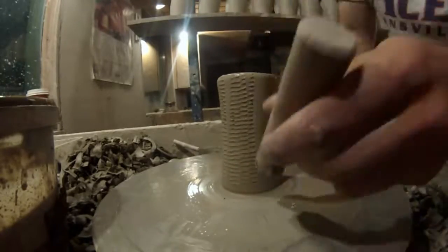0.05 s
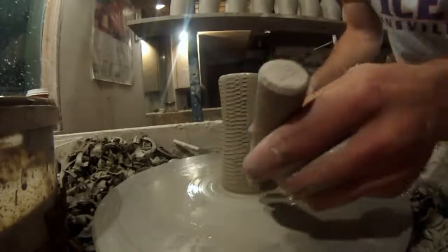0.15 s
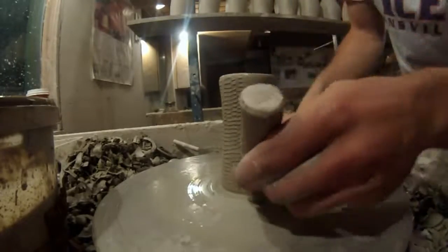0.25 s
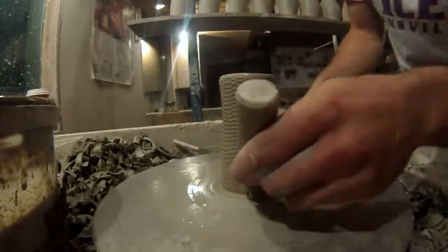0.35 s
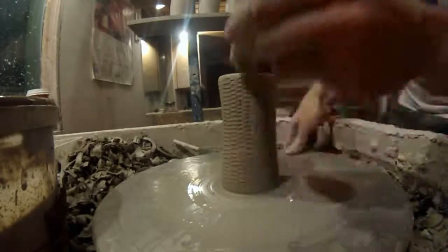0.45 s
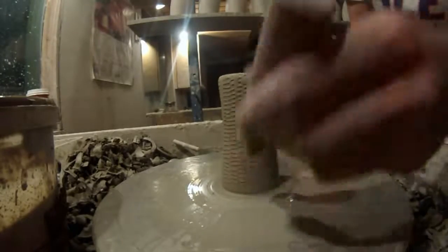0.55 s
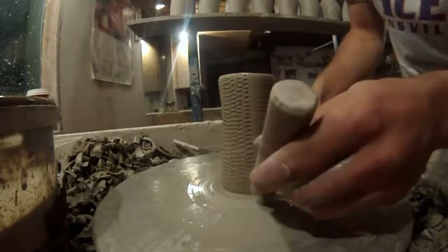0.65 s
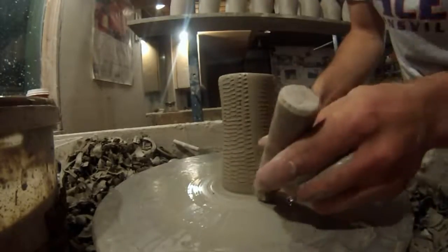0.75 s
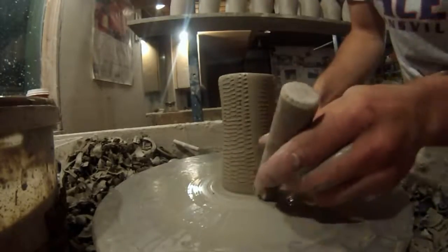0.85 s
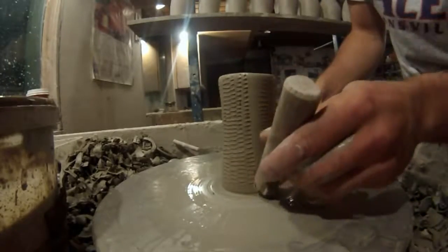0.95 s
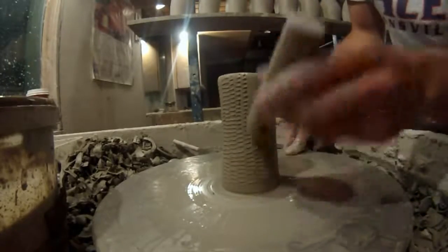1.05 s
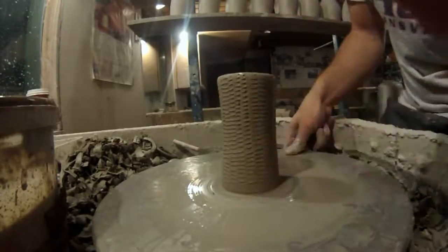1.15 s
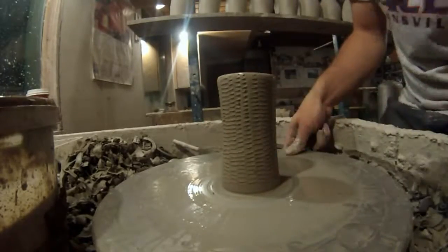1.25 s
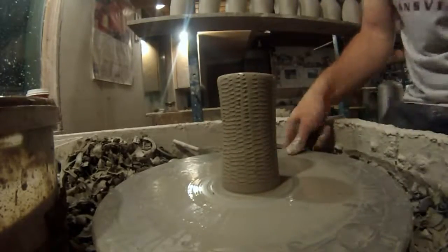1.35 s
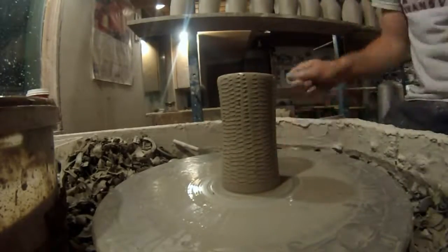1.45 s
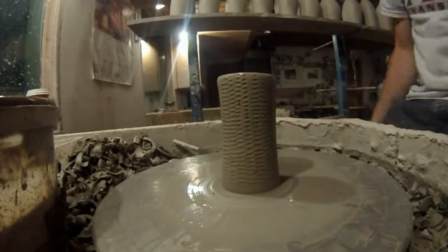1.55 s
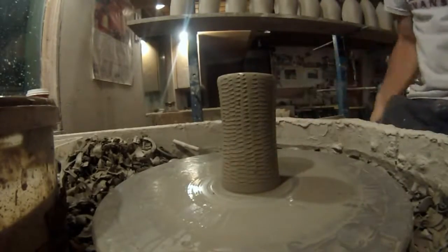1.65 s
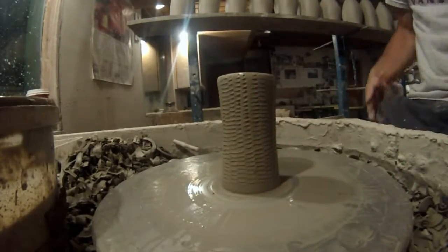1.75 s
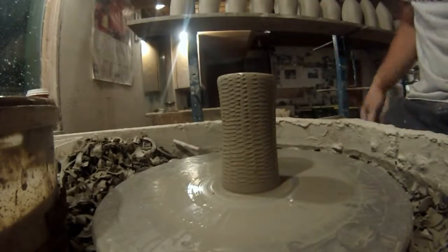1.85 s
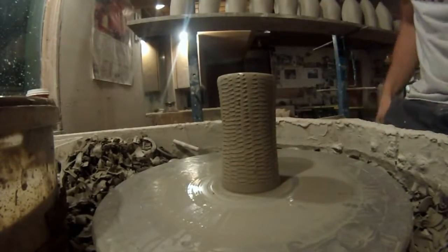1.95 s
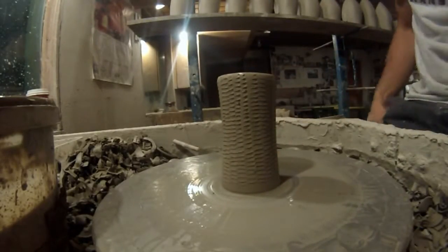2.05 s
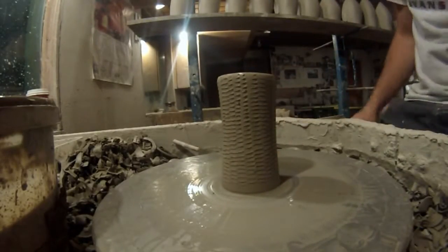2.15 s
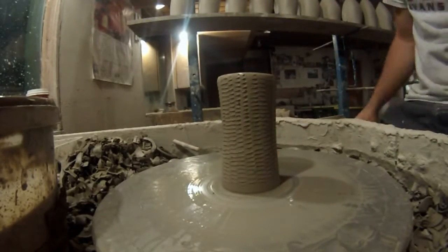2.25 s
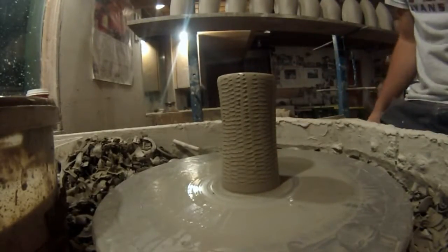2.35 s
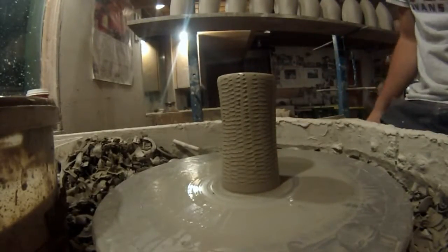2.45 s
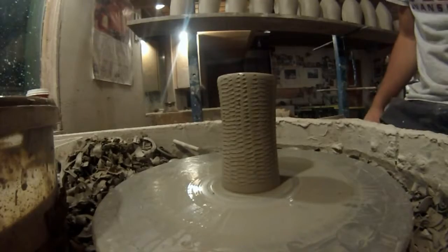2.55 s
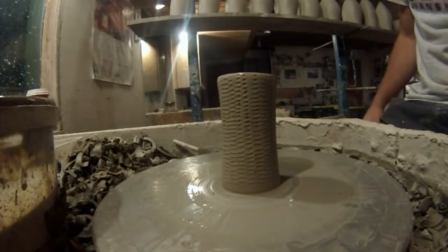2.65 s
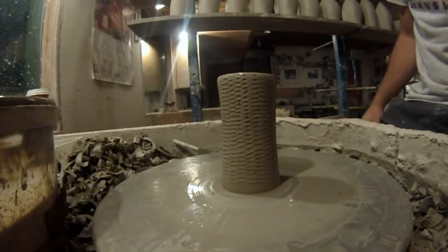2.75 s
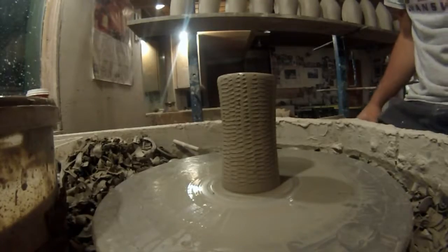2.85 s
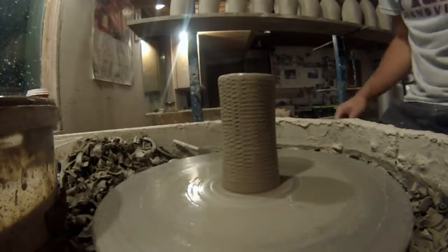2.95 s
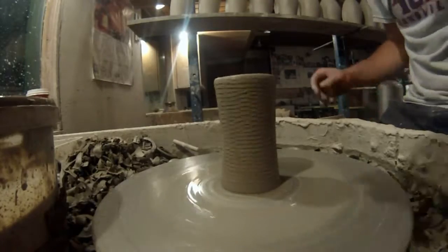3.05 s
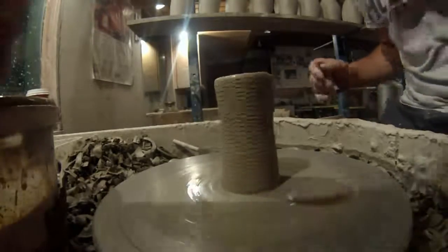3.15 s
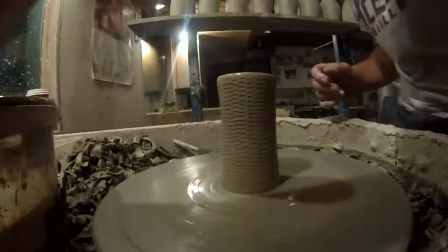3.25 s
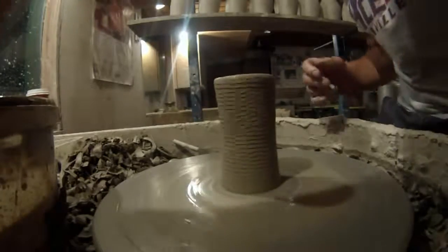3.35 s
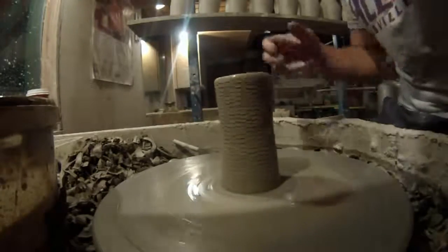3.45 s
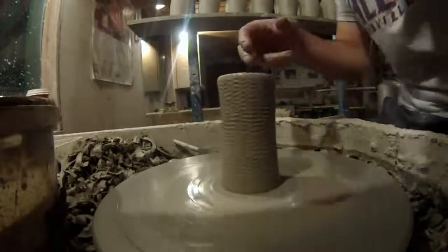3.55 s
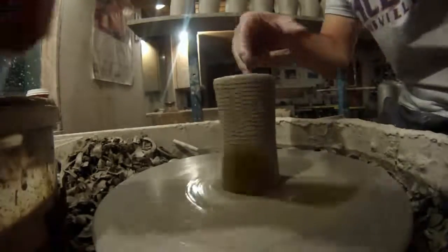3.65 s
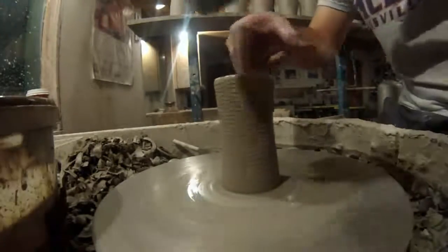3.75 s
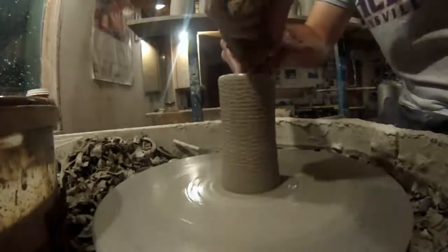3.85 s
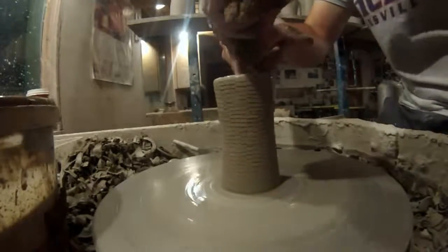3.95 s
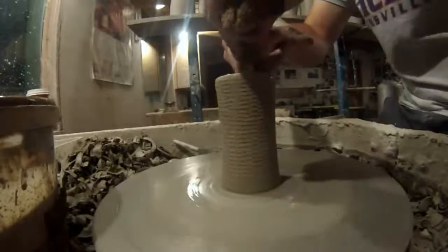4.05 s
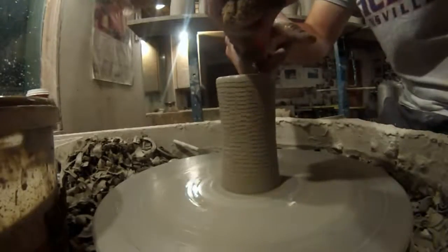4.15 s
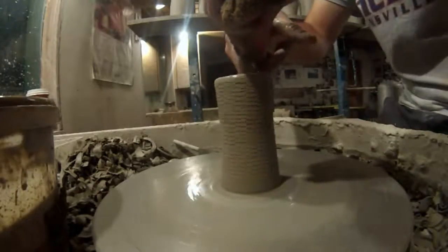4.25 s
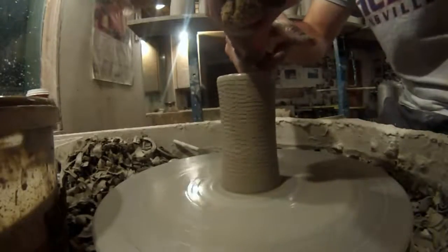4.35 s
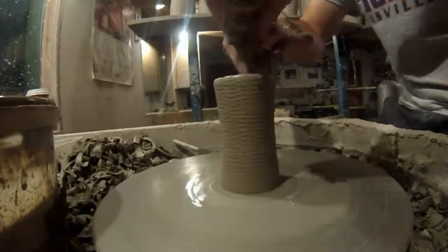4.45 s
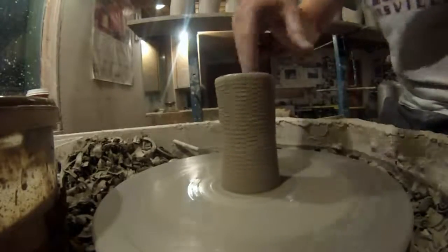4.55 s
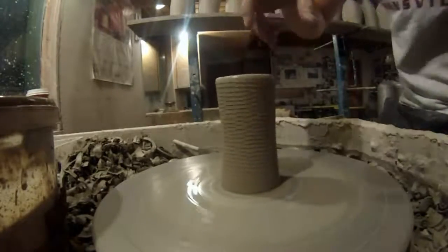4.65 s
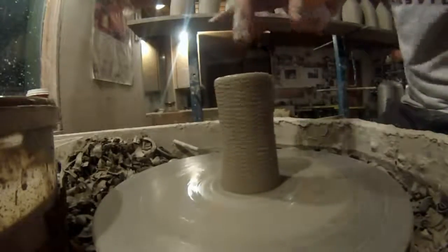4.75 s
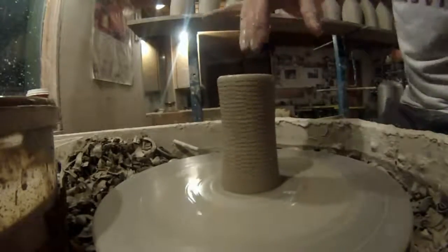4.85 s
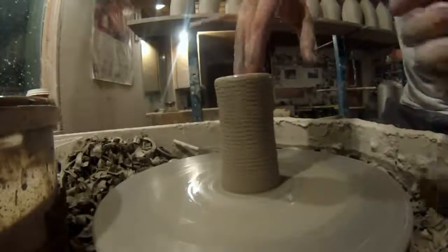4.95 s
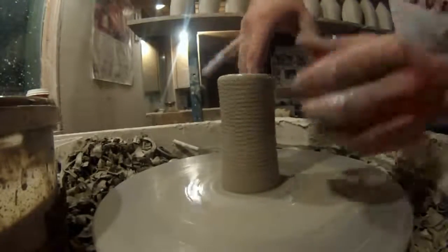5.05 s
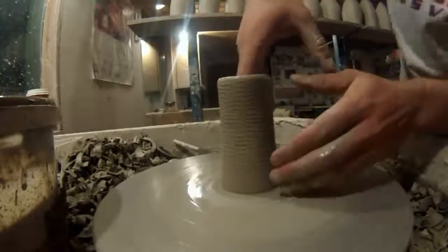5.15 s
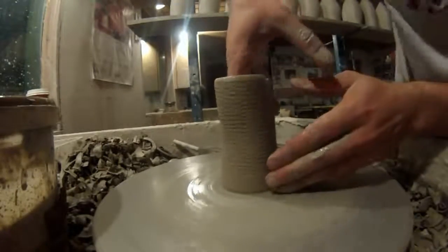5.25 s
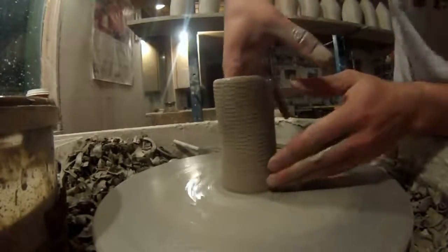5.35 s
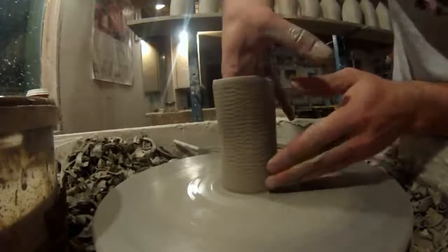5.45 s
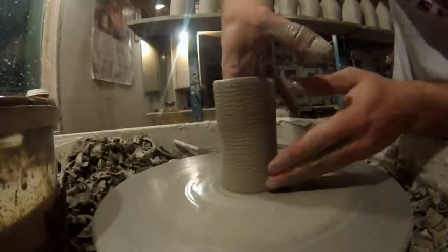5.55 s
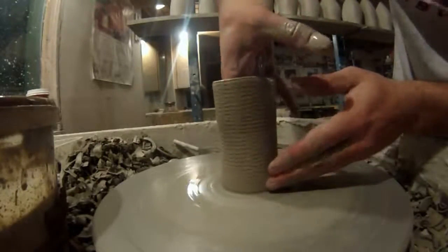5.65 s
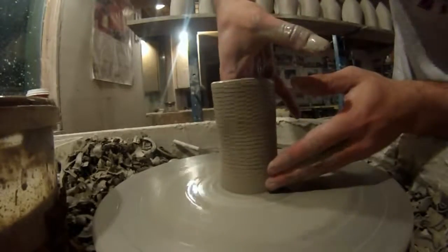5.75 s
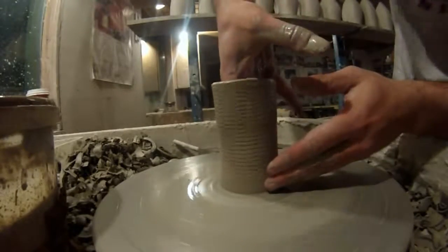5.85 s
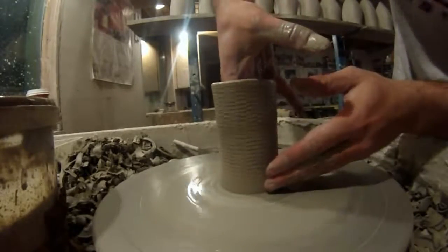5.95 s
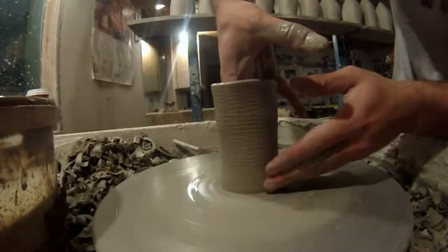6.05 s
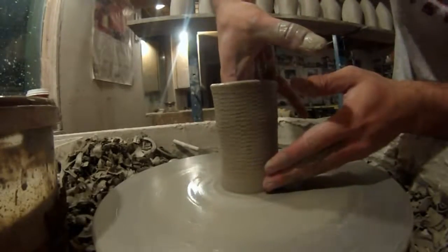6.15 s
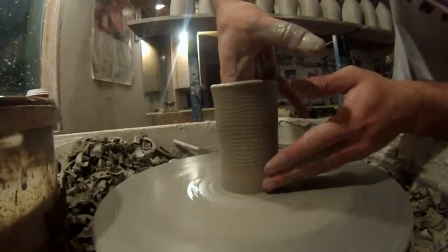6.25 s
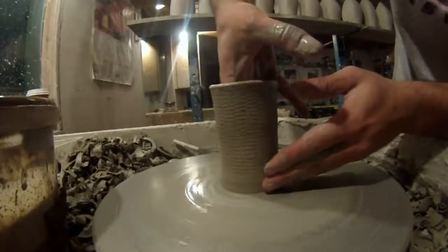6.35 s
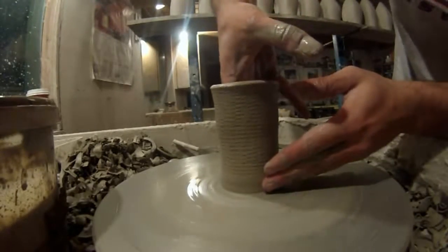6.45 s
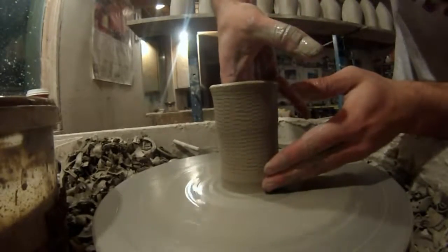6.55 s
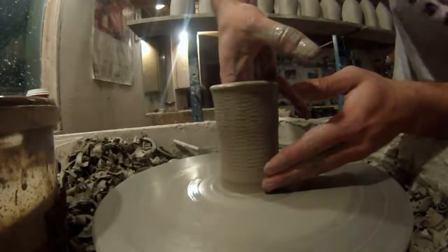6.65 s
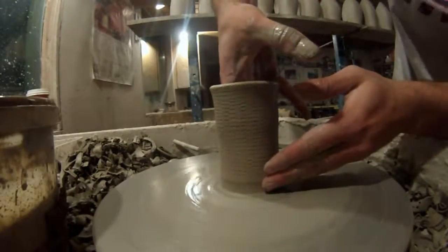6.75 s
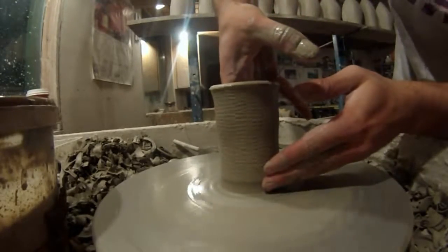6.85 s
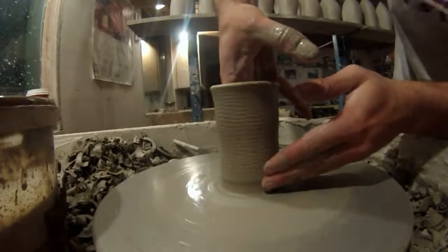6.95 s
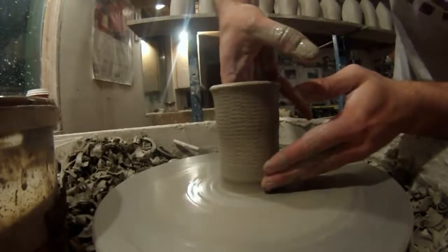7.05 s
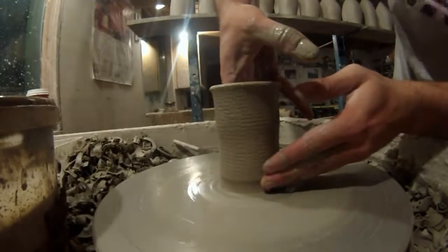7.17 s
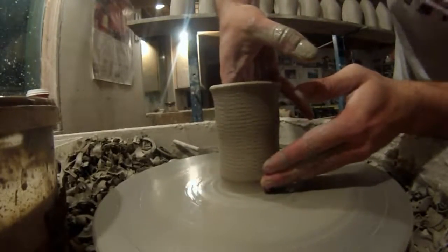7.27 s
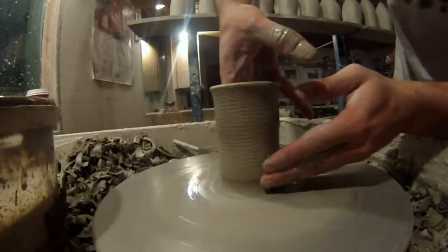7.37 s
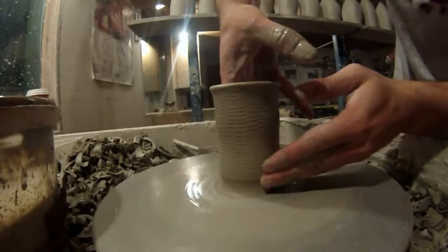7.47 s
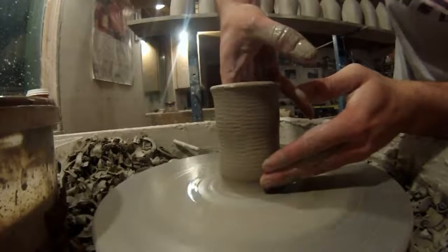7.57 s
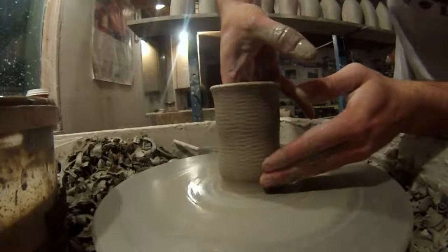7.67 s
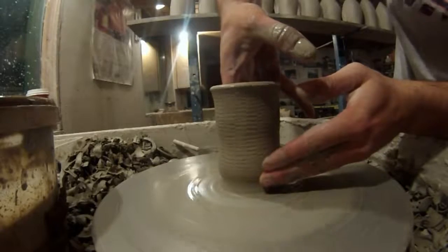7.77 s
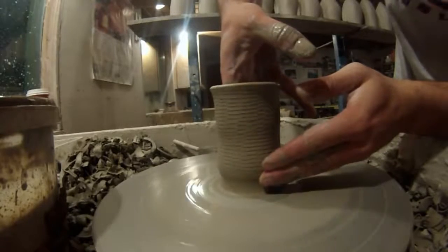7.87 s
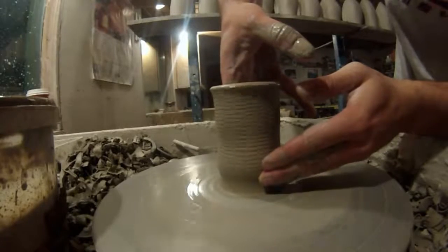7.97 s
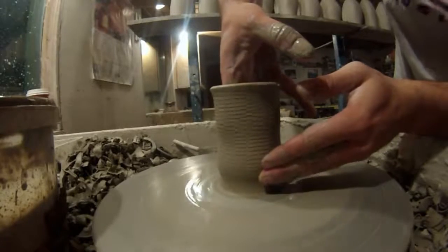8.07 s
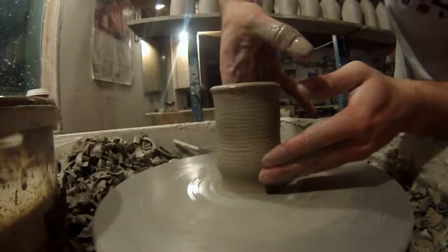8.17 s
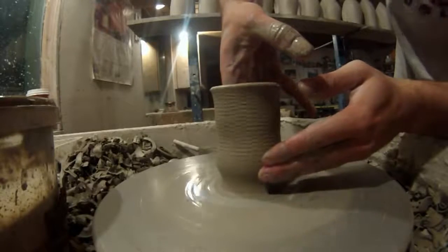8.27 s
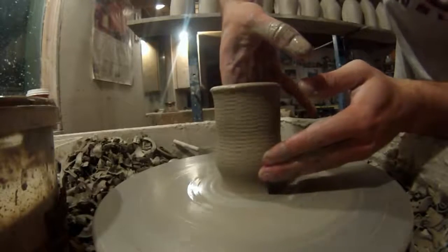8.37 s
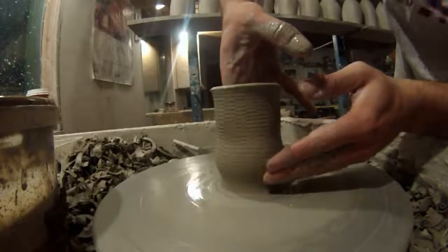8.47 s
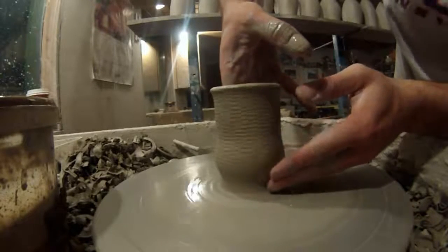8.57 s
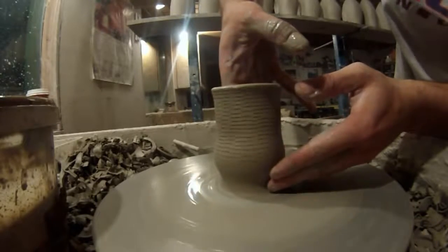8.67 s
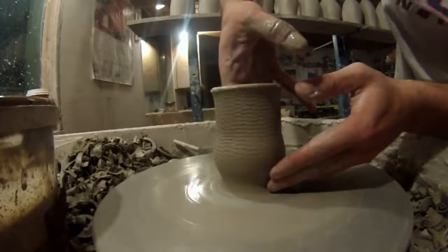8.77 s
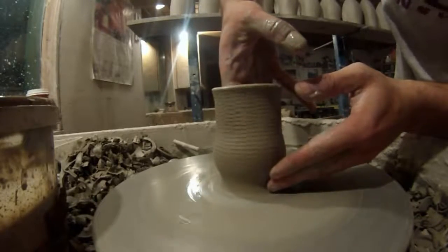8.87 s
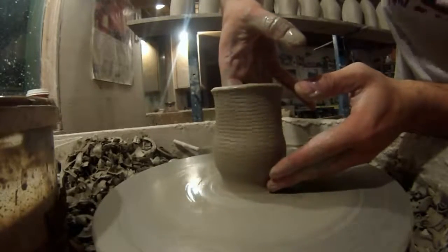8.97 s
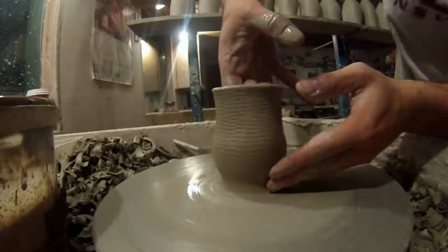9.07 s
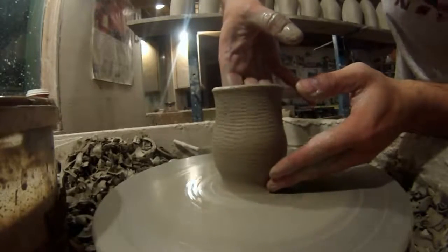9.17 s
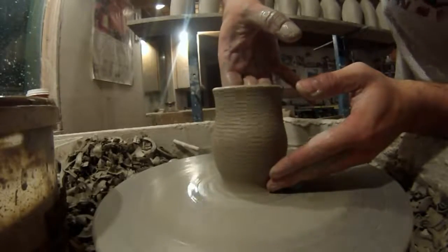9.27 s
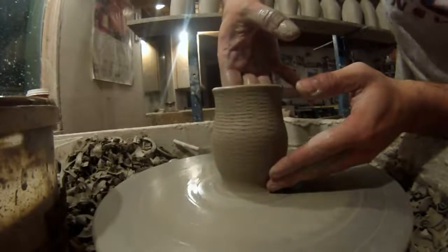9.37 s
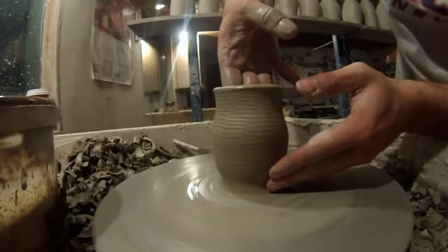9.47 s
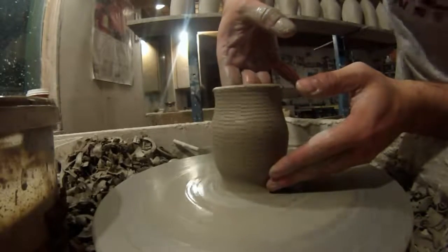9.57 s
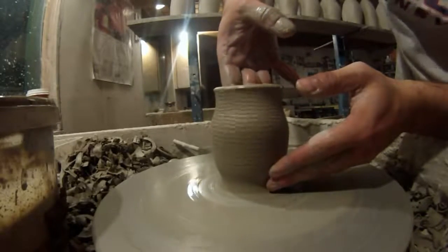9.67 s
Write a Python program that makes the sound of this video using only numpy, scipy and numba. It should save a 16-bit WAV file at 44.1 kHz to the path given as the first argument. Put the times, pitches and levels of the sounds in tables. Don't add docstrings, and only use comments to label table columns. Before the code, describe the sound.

Quiet workshop hiss and fan hum, soft clay rubbing and a wooden tool clack, then a pedal thump starts a low, rumbling, knocking pottery wheel motor.

```python
import sys
import numpy as np
from scipy import signal
from scipy.fft import rfft, irfft
from scipy.io import wavfile
from scipy.ndimage import uniform_filter1d
from numba import njit

SR = 44100
rng = np.random.default_rng(int(sys.argv[2]) if len(sys.argv) > 2 else 0)


def decibels_to_gain(level_db):
    exponent = np.asarray(level_db, float) / 20
    return 10 ** exponent


def digitize_waveform(pressure):
    field = np.atleast_2d(pressure).T
    bounded = np.clip(field, -1, 1)
    quanta = np.round(bounded * 32767).astype(np.int16)
    wavfile.write(sys.argv[1], SR, quanta)


N = 428211
T = np.arange(N) / SR
START_S, HANDS_ON_S = 3.025, 4.95


def unit(x):
    return x / np.sqrt(np.mean(x ** 2))


def curves(table):
    s, *columns = np.transpose(table)
    return [np.interp(T, s, c) for c in columns]


@njit
def svf(x, hz, width):
    y, low_state, band_state = np.empty(len(x)), 0., 0.
    for i in range(len(x)):
        g, k = np.tan(np.pi * hz[i] / SR), width[i] / hz[i]
        v = (band_state + g * (x[i] - low_state)) / (1 + g * (g + k))
        band_state = 2 * v - band_state
        low_state += 2 * g * v
        y[i] = k * v
    return y


def band(x, hz, width):
    return svf(x, hz + np.zeros(N), width + np.zeros(N))


def noise():
    return rng.standard_normal(N)


def walk(rate):
    k = int(SR / rate)
    held = np.repeat(rng.standard_normal(N // k + 1), k)
    return unit(uniform_filter1d(uniform_filter1d(held, k), k)[:N])


def coloured(points):
    hz, db = np.transpose(points)
    f = np.arange(N // 2 + 1) * SR / N + 1
    gain = decibels_to_gain(np.interp(np.log(f), np.log(hz), db))
    return unit(irfft(rfft(noise()) * gain, N))


def add(out, s, db, hz, t60, rise=0.):
    t = np.arange(int(.4 * SR)) / SR
    ring = decibels_to_gain(db - 60 * t / t60) * np.sin(2 * np.pi * hz * t) * (1 - np.exp(-t / (rise + 1e-5)))
    i = int(s * SR)
    out[i:i + len(t)] += ring[:N - i]


# pitch_hz, level_db (per Hz)
ROOM_COLOUR = [(12, -27.5), (20, -4.5), (92, 0), (123, -4.5), (155, -7.5), (182, -10.5), (334, -19),
               (500, -27), (650, -47.5), (1100, -120)]
ROOM_DB, ROOM_QUIET_DB, ROOM_CALMS_S = -46.5, -48, 1.88
FAN_HZ, FAN_DB, FAN_QUIET_DB = 154, -57.5, -71.5
FAN_BEAT_S, FAN_BEAT_PEAK_S, FAN_BEAT_DB = .55, .86, 2


def room_and_fan():
    calm = np.clip((T - ROOM_CALMS_S) / 0.13, 0, 1)
    rumble_db = ROOM_DB + (ROOM_QUIET_DB - ROOM_DB) * calm
    rumble = decibels_to_gain(rumble_db + 1.2 * walk(22)) * coloured(ROOM_COLOUR)
    beat = np.cos(2 * np.pi * (T - FAN_BEAT_PEAK_S) / FAN_BEAT_S)
    fan_db = FAN_DB + (FAN_QUIET_DB - FAN_DB) * calm + FAN_BEAT_DB * beat
    fan_hz = FAN_HZ * (1 + 0.0036 * walk(11))
    return rumble + decibels_to_gain(fan_db) * unit(np.sin(2 * np.pi * np.cumsum(fan_hz) / SR))


# pitch_hz, level_db (per Hz)
AIR_COLOUR = [(240, -34.5), (400, -6), (479, -6), (654, -4), (702, -4.5), (760, -3.5), (857, -7),
              (1230, -7), (1330, -1), (2030, -11), (2270, -9), (2530, -12), (3260, -6.5), (3940, -11.5),
              (4400, -24), (5720, -49), (9680, -120)]
# pitch_hz, width_hz, level_db
HOUSING_TONES = [(1513, 510, 4.5), (2380, 260, 4.5), (2920, 670, -2)]
AIR_DB = -54


def housing_hiss():
    air = coloured(AIR_COLOUR)
    air = air + sum((decibels_to_gain(db) - 1) * band(air, f, w) for f, w, db in HOUSING_TONES)
    return decibels_to_gain(AIR_DB + 0.84 * walk(9)) * unit(air)


INSECT_DB, INSECT_FADES_DB_PER_S, INSECT_SWELL_DB = -80.5, 0.2, 2.1
INSECT_PERIOD_S, INSECT_PEAK_S = .712, .33
WHINE_HZ, WHINE_DB = 14620, -101


def insects_and_whine():
    swell = np.cos(2 * np.pi * (T - INSECT_PEAK_S) / INSECT_PERIOD_S)
    chorus_db = INSECT_DB - INSECT_FADES_DB_PER_S * T + INSECT_SWELL_DB * swell + 2.2 * walk(30)
    flutter_hz = 56.3 * (1 + .004 * walk(2))
    throb = 1 + .22 * np.sin(2 * np.pi * np.cumsum(flutter_hz) / SR)
    wings = band(band(noise(), 12450, 2300), 12450, 2300)
    whine = decibels_to_gain(WHINE_DB) * unit(band(noise(), WHINE_HZ, 30))
    return decibels_to_gain(chorus_db - 3) * unit(throb ** 2 * wings) + whine


def snap_across(table, gain_db, slower):
    out, t = np.zeros(N), np.arange(-600, 600) / SR
    for s, db, ms in table:
        u = t / (slower * ms / 1000)
        i = int(s * SR) - 600
        out[i:i + len(t)] -= decibels_to_gain(db + gain_db) * u / (1 + u ** 2) ** 1.33 * np.hanning(len(t))
    return out


# middle_s, peak_db, snap_ms (sign gives the direction)
LEANS = [(0.2328, -49, 0.71), (0.2674, -47, 0.8), (0.3417, -38, 0.88), (0.5291, -45, 0.8),
         (0.6427, -41, -0.8), (0.7521, -43, -0.8), (0.8567, -40, -0.8), (0.9442, -38, 0.68),
         (1.0155, -44, 0.72), (1.3994, -39, 0.68), (1.5576, -44, -0.8), (1.5846, -51, 0.8),
         (1.8002, -47, 0.8), (1.8729, -46, -0.8), (1.9871, -49, -0.74), (2.2774, -46, -0.8),
         (2.3158, -48, -0.8), (2.7571, -46, -0.8), (2.9723, -44, -0.8)]


def potter_leaning():
    return snap_across(LEANS, gain_db=7, slower=1.2)


# peak_s, peak_db, rise_db_per_s, fall_db_per_s
STROKES = [
    (0.47, -56, 300, 290),
    (0.81, -58, 300, 300),
    (0.848, -53, 900, 300),
    (0.885, -56, 300, 400),
    (0.945, -58, 400, 300),
]


def rubbing_clay():
    rub = band(noise(), 1720, 220)
    rub += decibels_to_gain(-6.0) * band(noise(), 2400, 400)
    rub += decibels_to_gain(-10.0) * band(noise(), 1470, 300)
    bright = band(band(noise(), 6100, 3500), 5500, 3500)
    rub = band(rub, 1600, 1500) + decibels_to_gain(-30) * bright
    level = sum(decibels_to_gain(db - np.where(T < s, rise, fall) * np.abs(T - s)) for s, db, rise, fall in STROKES)
    return level * unit(rub)


# start_s, peak_db, decay_s (to -60 dB)
CONTACTS = [
    (2.0455, -27.5, 0.033),
    (2.0479, -28, 0.036),
    (2.054, -36, 0.082),
    (2.0617, -39, .06),
    (2.073, -51, 0.043),
    (2.088, -46, .09),
]
# pitch_hz, width_hz, level_db
WOOD_TONES = [(482, 160, -8), (640, 130, -5.5), (996, 110, -6), (1350, 140, -11), (1650, 200, -7.5),
              (2090, 340, -12), (2275, 100, -4), (2800, 250, -4.5), (3210, 150, -6), (3450, 200, -12),
              (3980, 470, -16), (4930, 1100, -18), (5960, 1500, -18.5), (8000, 3000, -27)]
# start_s, peak_db, pitch_hz, decay_s
ROCKING = [(2.0452, -29.5, 2330, .06), (2.0482, -43, 3170, .06), (2.0482, -43, 1690, .07),
           (2.0565, -43, 3250, .04), (2.072, -43, 3180, .04), (2.0482, -43, 2720, .05),
           (2.0482, -41, 3430, .04), (2.0455, -46, 4900, .04), (2.07, -45, 2330, .08),
           (2.087, -46, 2280, .05), (2.094, -46, 2500, .02), (2.06, -42, 680, .07), (2.078, -48, 640, .1),
           (2.094, -46, 450, .03)]
BLOW_DB, SCRAPE_DB = 14, -3.5


def tool_put_down():
    drag = sum(decibels_to_gain(db - 60 * np.abs(T - s) / t60) * (T > s) for s, db, t60 in CONTACTS)
    contact = decibels_to_gain(SCRAPE_DB) * noise() * drag
    contact += sum(decibels_to_gain(db + BLOW_DB) * np.maximum(1 - np.abs(T - s) * SR, 0) for s, db, t60 in CONTACTS)
    out = np.zeros(N)
    for k, (f, w, db) in enumerate(WOOD_TONES):
        tone = band(band(contact, f, w), f, 4.3 * w)
        out += (-1) ** k * decibels_to_gain(db + 17) * tone * np.sqrt(100 / w)
    out = band(out, 1800, 5700)
    for s, db, f, t60 in ROCKING:
        add(out, s, db, f, t60, rise=1.7 / f)
    return out


# start_s, peak_db, pitch_hz, decay_s
TICK_TIMES = [(5.4485, -34, 600, 0.02), (6.062, -46, 765, .06), (6.13, -41, 516.7, .12),
              (6.476, -37, 1150, .02), (6.035, -42, 720, 0.14), (6.045, -38.5, 795, 0.1),
              (6.055, -44, 870, 0.12), (6.155, -35, 539, .12), (5.05, -50, 820, .12), (5.075, -44, 720, .1),
              (6.285, -43, 850, .03), (7.504, -41, 1050, 0.023)]


def ticks():
    out = np.zeros(N)
    for s, db, f, t60 in TICK_TIMES:
        add(out, s, db, f, t60, rise=t60 / 15)
    return out


# time_s, pitch_hz, level_db
BELT_SPEED = [(3.05, 434, -48.5), (3.4, 510, -55), (3.62, 550, -55), (3.78, 592, -56), (3.9, 624, -49.5),
              (4.1, 630, -49), (4.25, 620, -51), (4.45, 657, -50.5), (4.6, 625, -51), (4.7, 660, -53),
              (4.85, 607, -60), (5.25, 480, -51), (5.8, 522, -58), (6.3, 565, -55.5), (6.8, 590, -57.5),
              (9.71, 595, -58)]
WIDTH_FREE_HZ, WIDTH_HELD_HZ, SPREADS_S = 90, 170, 2.2


def whir():
    hz, db = curves(BELT_SPEED)
    hz = hz * (1 + 0.017 * walk(18))
    held = np.clip((T - HANDS_ON_S) / SPREADS_S, 0, 1)
    width = WIDTH_FREE_HZ + (WIDTH_HELD_HZ - WIDTH_FREE_HZ) * held
    rough = noise() * decibels_to_gain(0.47 * walk(60) + 0.79 * walk(3.5))
    belt = unit(svf(svf(rough, hz, width), hz, width) / np.sqrt(width))
    belt = belt / (uniform_filter1d(belt ** 2, 600) + .2) ** .25
    return unit(belt) * decibels_to_gain(db) * np.clip((T - START_S) / 0.12, 0, 1)


# middle_s, peak_db, snap_ms (sign gives the direction)
HEAD_SNAPS = [(4.2481, -33, -0.74), (4.8424, -37, -0.8), (5.289, -30.5, -0.59), (5.3108, -34, 0.66),
              (5.3736, -40, 0.88), (5.4515, -32, -0.89), (5.5308, -40, 0.8), (5.5724, -36, 0.8),
              (5.7566, -35, 0.8), (5.7712, -32, 0.8), (5.799, -35, -0.8), (5.8576, -31, 0.91),
              (5.896, -26, 0.93), (5.9342, -34, -0.8), (6.0655, -28, 0.73), (6.292, -27, -0.85),
              (6.4784, -26.5, 0.9), (6.5434, -31, 0.81), (6.6621, -35, 0.86), (6.8599, -33.5, -0.6),
              (7.3221, -29, 0.77), (7.3723, -37, 0.77), (7.507, -23, -0.91), (7.6279, -34, 0.87),
              (8.1657, -33, 0.86), (8.2833, -31, -0.8), (8.3652, -33, 0.69), (8.3735, -29, 0.8),
              (8.629, -34, 0.87), (8.9062, -41, -0.86), (9.0846, -40, -0.8), (9.3067, -31, 0.79),
              (9.4206, -33, -0.8), (9.4471, -31, -0.8), (9.4698, -30, 0.8), (9.5361, -35, -0.76),
              (9.5959, -33, -0.8), (9.6283, -30, -0.9)]


def wheel_head_jolts():
    return snap_across(HEAD_SNAPS, gain_db=7.5, slower=0.94)


# time_s, pitch_hz (of the shudder), level_db
MOTOR_EFFORT = [(3.03, 124.8, -28), (3.14, 117.5, -27.5), (3.5, 116.6, -37.5), (3.8, 117.7, -29.5),
                (4.2, 122.7, -29), (4.5, 118.9, -35.5), (4.8, 111, -29), (5.05, 125, -30.5),
                (5.35, 104, -33.5), (5.8, 114.4, -33.5), (6.1, 111.7, -29), (6.4, 130.9, -30.5),
                (6.9, 124.1, -30), (7.15, 102.8, -30), (7.75, 109.1, -32), (8.6, 131.5, -32.5),
                (9.0, 115.2, -28.5), (9.71, 113, -34.5)]
# ratio (to the shudder pitch run backwards in time), level_db
LOOSE_PARTS = [(.76, -13.5), (1.37, -13)]
SHUDDER_WANDER, SHUDDER_SWELL_DB = .055, 0.5


def shudder():
    hz, hum_db = curves(MOTOR_EFFORT)
    hz = hz * (1 + SHUDDER_WANDER * walk(6))
    hum_db = hum_db + SHUDDER_SWELL_DB * walk(8.8)
    phase = 2 * np.pi * np.cumsum(hz * (1 + .075 * walk(110) + .05 * walk(22))) / SR
    swing = decibels_to_gain(1.3 * walk(45))
    hum = unit(swing * np.sin(phase) + decibels_to_gain(-17.0) * swing ** 2 * np.sin(2 * phase + 1.0))
    hum = unit(hum + sum(decibels_to_gain(db + 1.5) * np.sin(ratio * phase[::-1]) for ratio, db in LOOSE_PARTS))
    return decibels_to_gain(hum_db - 1.5) * hum


# pitch_hz, level_db (per Hz)
RUMBLE_COLOUR = [(12, -17.5), (25, -2), (40, -4), (60, -4.5), (90, 2.5), (140, 2), (190, -5.5),
                 (300, -22.5), (500, -24.5), (900, -51), (2000, -75)]
RUMBLE_DB, RUMBLE_GROWS_DB_PER_S, RUMBLE_SWELL_DB = -38.5, 0.44, -0.5


def drive_rumble():
    db = RUMBLE_DB + RUMBLE_GROWS_DB_PER_S * (T - START_S) + RUMBLE_SWELL_DB * walk(5)
    return decibels_to_gain(db + 5.5) * coloured(RUMBLE_COLOUR)


# pitch_hz, width_hz, level_db
FRAME_TONES = [(233.3, 69, 6), (321, 145, -7.5), (453, 205, -8.5), (772, 360, -19.5)]
RATTLE_DB, RATTLE_FADES_DB_PER_S, RATTLE_SWELL_DB = -38, 0.4, 1


def frame_rattle():
    size_db = 3.5 * np.minimum(rng.exponential(size=N), 2.2)
    blows = (rng.random(N) < 175 / SR) * decibels_to_gain(size_db) * np.sign(noise())
    blows = uniform_filter1d(blows, 24)
    rattle = np.zeros(N)
    for k, (f, w, db) in enumerate(FRAME_TONES):
        rattle += (-1) ** k * decibels_to_gain(db) * band(band(blows, f, 1.37 * w), f, 1.37 * w)
    level_db = RATTLE_DB - RATTLE_FADES_DB_PER_S * (T - START_S) + RATTLE_SWELL_DB * walk(10)
    return decibels_to_gain(level_db) * unit(rattle)


# start_s, peak_db, pitch_hz
DRIVE_KNOCKS = [(3.266, -36, 229), (3.736, -25, 233), (4.546, -40, 215.6), (5.078, -31, 261),
                (5.266, -23, 258), (5.658, -34, 265), (5.95, -33, 283), (6.027, -31, 251.8),
                (6.966, -33, 253), (7.838, -36, 220), (7.902, -44, 256), (8.283, -23, 280.4),
                (8.85, -38, 260), (9.46, -27, 299), (9.532, -34, 220), (3.59, -42, 289),
                (4.839, -28, 297.5), (4.925, -47, 251.1), (5.289, -19.5, 240), (5.308, -23, 237),
                (5.448, -26, 300), (5.753, -31, 259), (5.869, -36, 222.6), (5.925, -37, 221),
                (6.288, -23, 221.4), (6.474, -30, 246.3), (6.542, -27, 310.5), (6.657, -34, 242),
                (6.788, -39, 221), (6.856, -36, 277), (7.019, -29, 221), (7.152, -28, 221.8),
                (7.176, -30, 284.4), (7.319, -32, 222), (7.348, -21, 249.7), (7.369, -32, 266),
                (7.502, -15, 215), (7.625, -37, 221.3), (8.626, -36, 269), (9.046, -43, 250.2),
                (9.225, -45, 220.2), (9.299, -19, 220.6), (9.416, -22.5, 292.3), (9.591, -29.5, 310),
                (9.622, -21, 244)]
# start_s, peak_db, pitch_hz (minus swings the other way first)
PEDAL_THUMP = [
    (3.008, -24, 186),
    (3.015, -22, 257),
    (3.016, -21, -46),
    (3.027, -16, 155),
]


def motor():
    rattle = frame_rattle()
    shake = shudder() + drive_rumble() + decibels_to_gain(-15.5) * rattle
    quick, slow = uniform_filter1d(shake ** 2, 700), uniform_filter1d(shake ** 2, 9000)
    out = shake * (slow / (quick + 0.073 * slow)) ** 0.41 + decibels_to_gain(-7.5) * rattle
    out *= np.clip((T - START_S) / 0.013, 0, 1)
    for s, db, f in DRIVE_KNOCKS:
        add(out, s + .001, db + 5, 1.06 * f, .019, rise=.003)
    for s, db, f in PEDAL_THUMP:
        add(out, s, db, f, 4.8 / abs(f), rise=0.00055)
    return out


JOLT_DIP_DB = 20


def scene():
    snaps = wheel_head_jolts()
    force = uniform_filter1d(uniform_filter1d(np.abs(snaps), 300), 300)
    dip = 1 / (1 + decibels_to_gain(JOLT_DIP_DB) * force)
    workshop = room_and_fan() + housing_hiss() + insects_and_whine()
    potter = potter_leaning() + rubbing_clay() + tool_put_down() + ticks()
    wheel = whir() + snaps + motor() * dip
    return (workshop + potter + wheel)[None]


def low_pass(x):
    return signal.sosfilt(signal.butter(12, 15220, fs=SR, output="sos"), x)


# pitch_hz, level_db (per Hz)
MIC_COLOUR = [(3000, -8), (4600, 3), (6300, -1), (7600, -3), (8300, -6), (10000, -5.5), (13000, -14),
              (14500, -15), (16000, -14.5)]
MIC_DB = -72
# pitch_hz (lower edge), share (of moments)
THINNED_TOP = [(12900, .1), (13800, .17), (15000, .55)]


def record(dry):
    hiss = decibels_to_gain(MIC_DB + 0.43 * walk(25)) * coloured([(20, -60.5), *MIC_COLOUR])
    heard = np.tanh(1.576 * (dry + hiss)) / 1.424
    chance = np.repeat(rng.random(N // 1024 + 1), 1024)[:N] / np.interp(T, [3.2, 5.5], [.5, 1.1])
    for edge_hz, share in THINNED_TOP:
        high_pass = signal.butter(8, edge_hz, "high", fs=SR, output="sos")
        top = signal.sosfiltfilt(high_pass, heard)
        thinned = (chance < share) * (T > 3.2) * 1.
        heard = heard - .7 * uniform_filter1d(thinned, 300) * top
    return low_pass(heard)


dry = scene()
out = record(dry)
digitize_waveform(out)
```